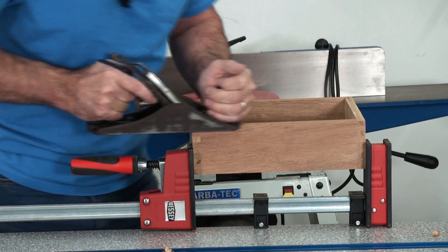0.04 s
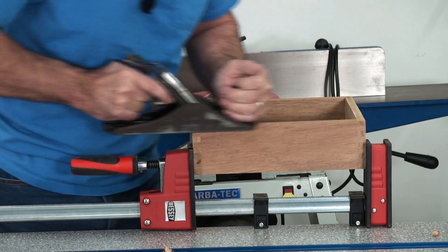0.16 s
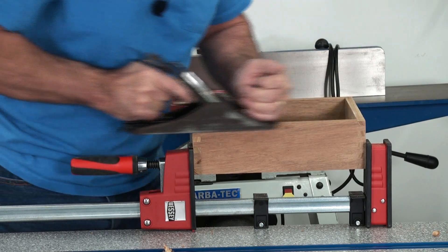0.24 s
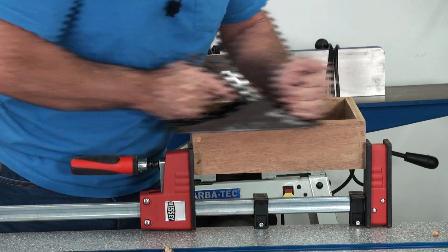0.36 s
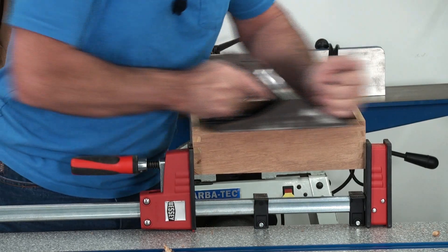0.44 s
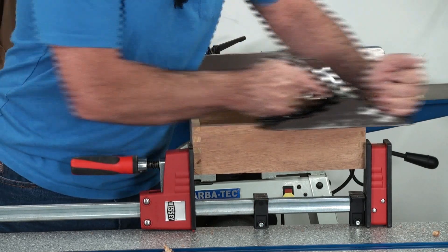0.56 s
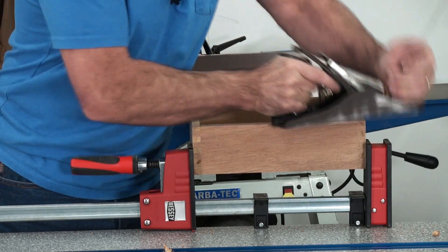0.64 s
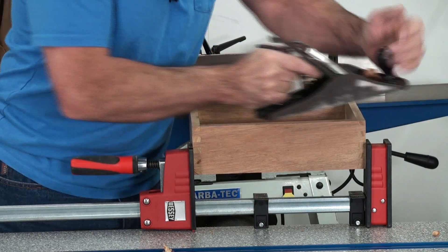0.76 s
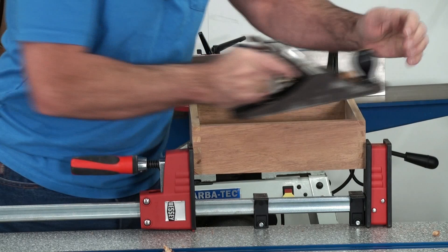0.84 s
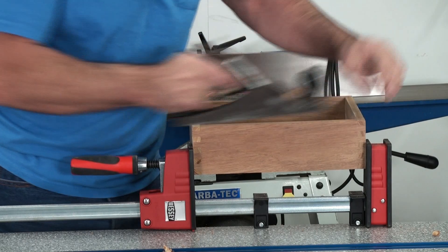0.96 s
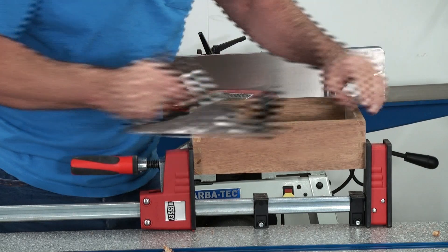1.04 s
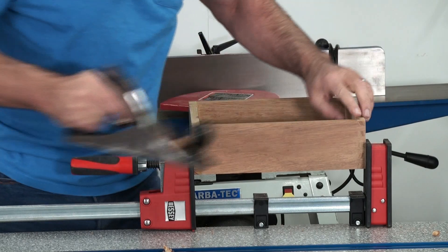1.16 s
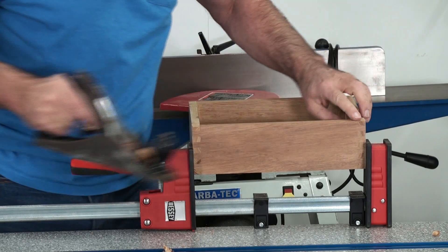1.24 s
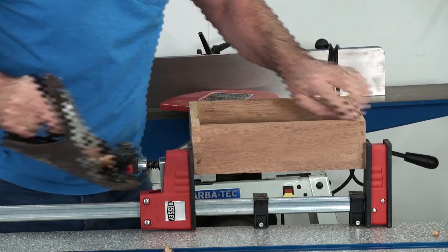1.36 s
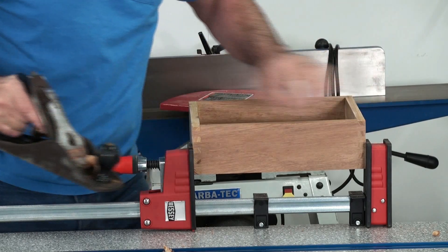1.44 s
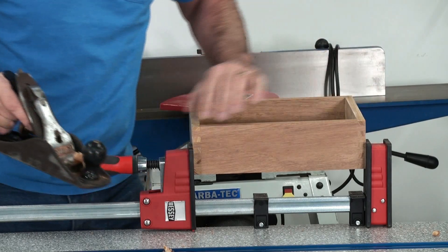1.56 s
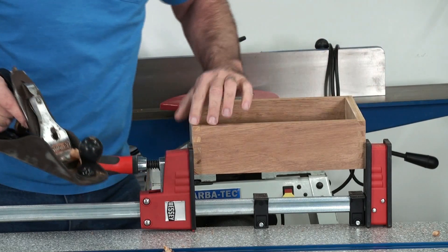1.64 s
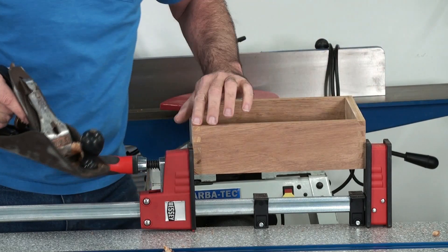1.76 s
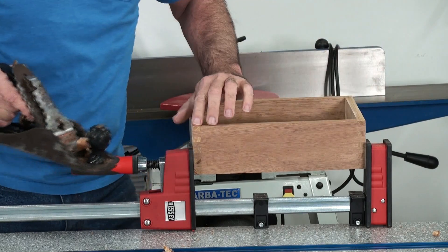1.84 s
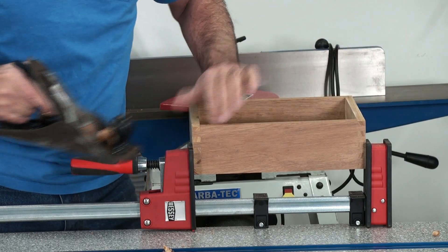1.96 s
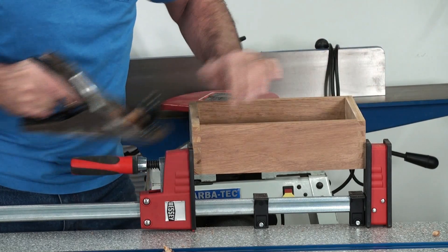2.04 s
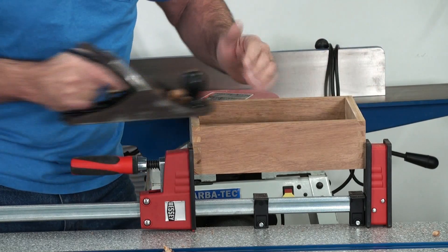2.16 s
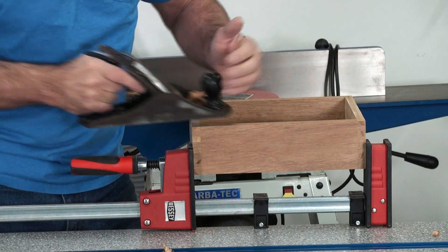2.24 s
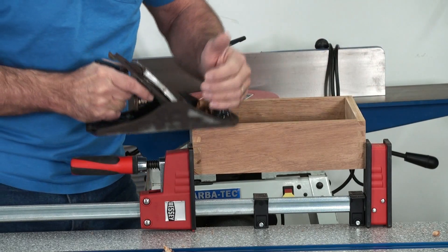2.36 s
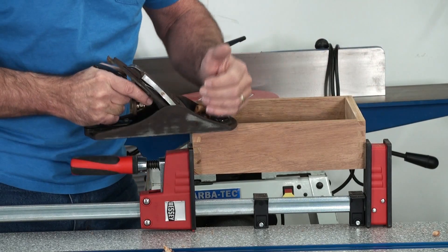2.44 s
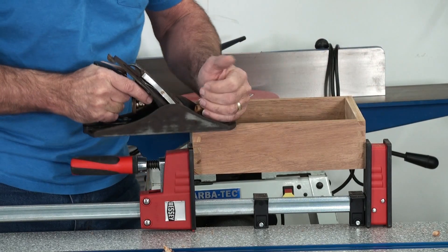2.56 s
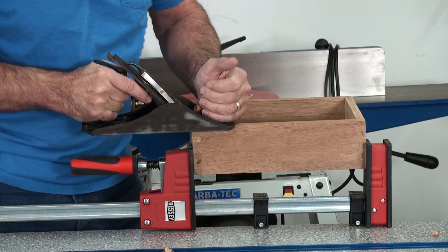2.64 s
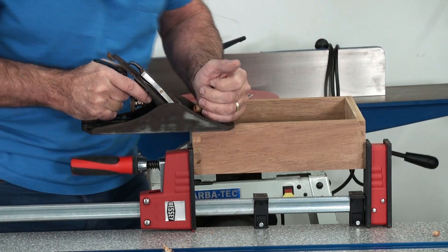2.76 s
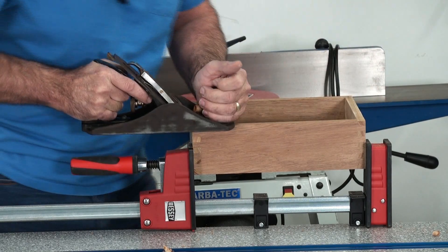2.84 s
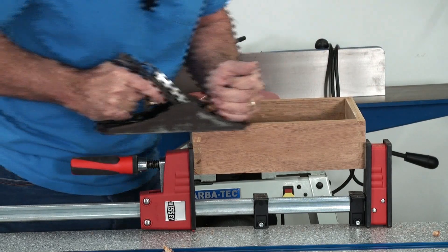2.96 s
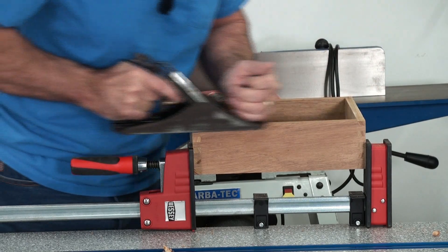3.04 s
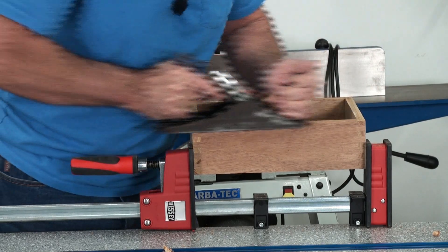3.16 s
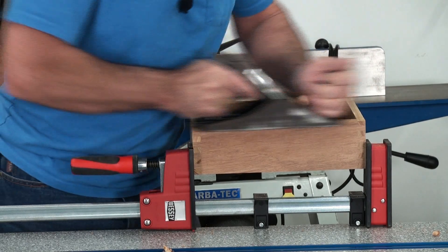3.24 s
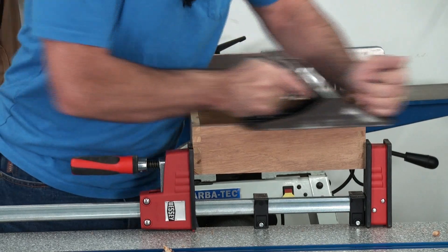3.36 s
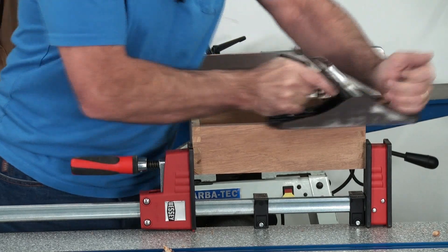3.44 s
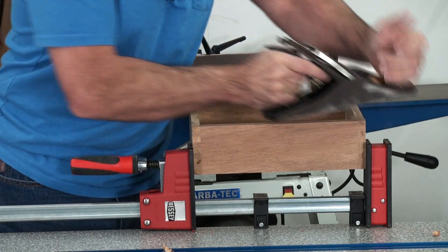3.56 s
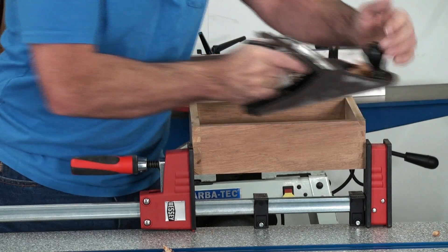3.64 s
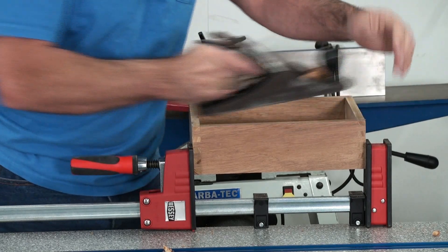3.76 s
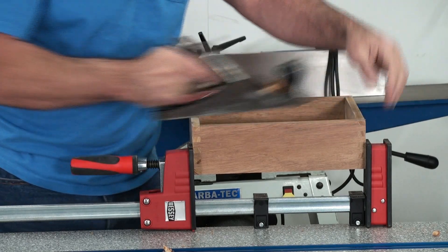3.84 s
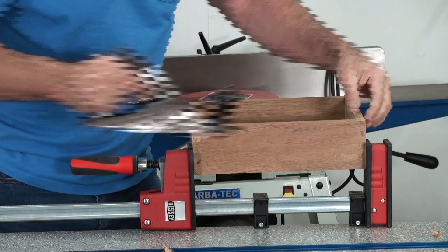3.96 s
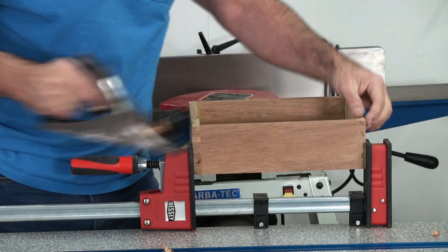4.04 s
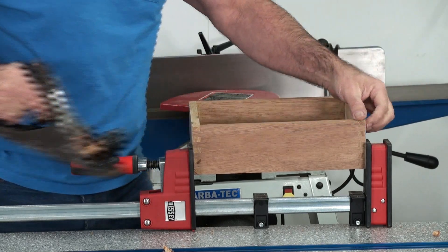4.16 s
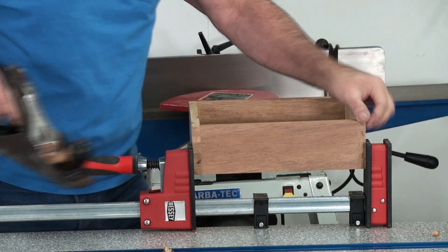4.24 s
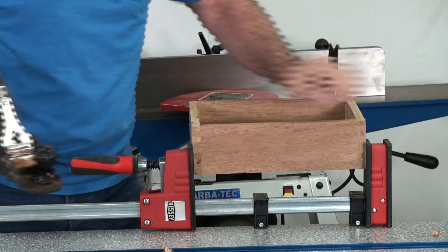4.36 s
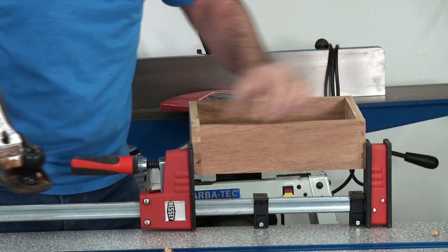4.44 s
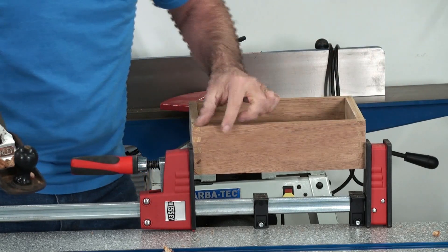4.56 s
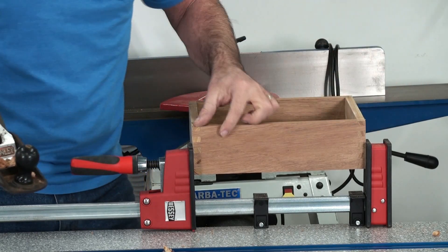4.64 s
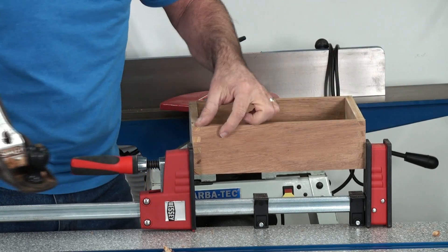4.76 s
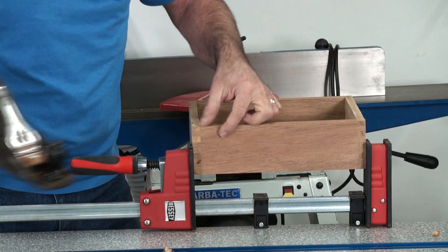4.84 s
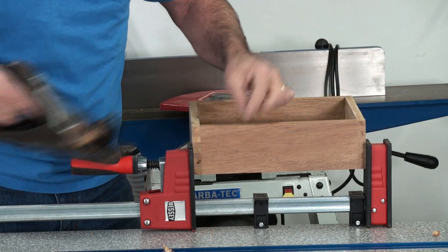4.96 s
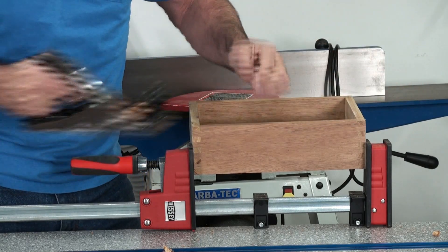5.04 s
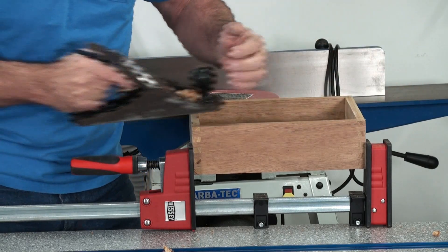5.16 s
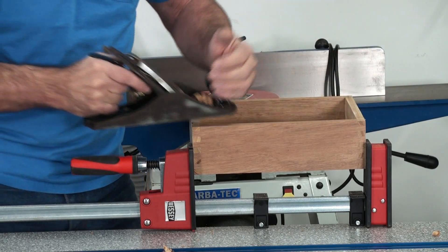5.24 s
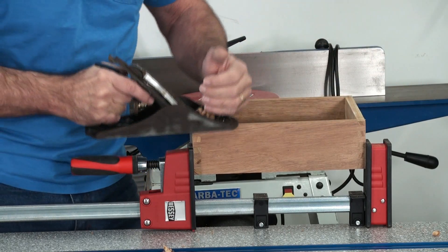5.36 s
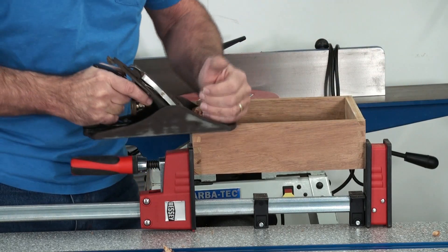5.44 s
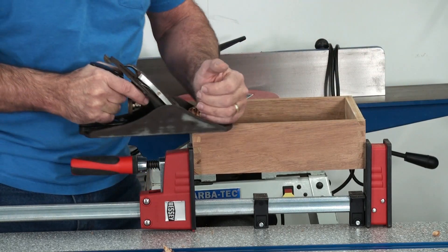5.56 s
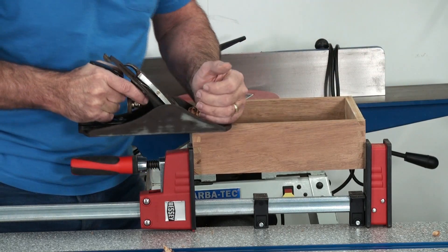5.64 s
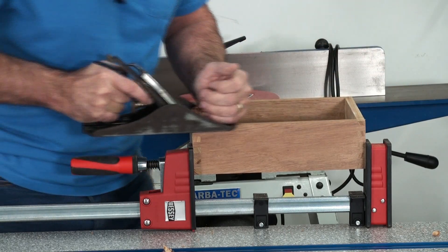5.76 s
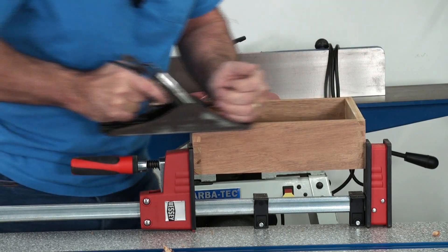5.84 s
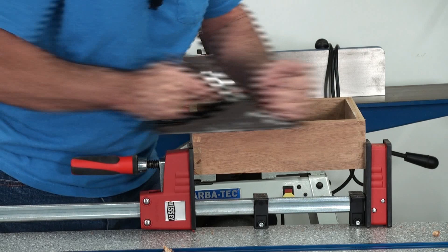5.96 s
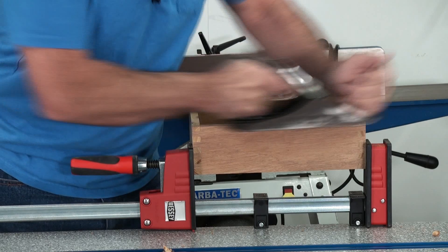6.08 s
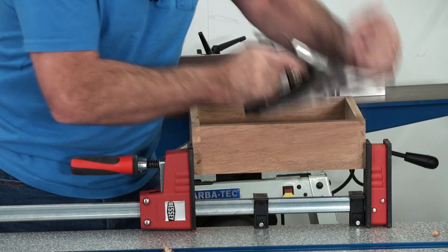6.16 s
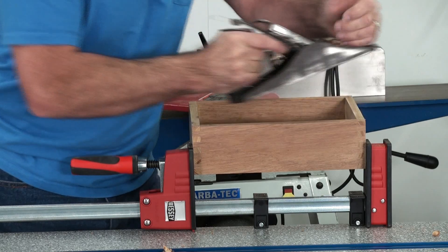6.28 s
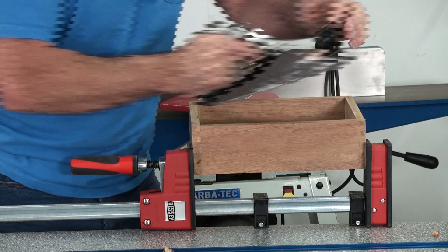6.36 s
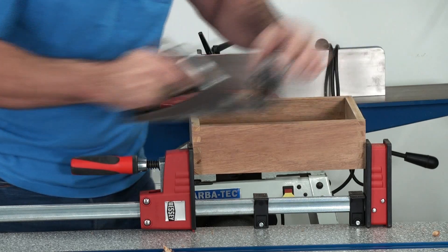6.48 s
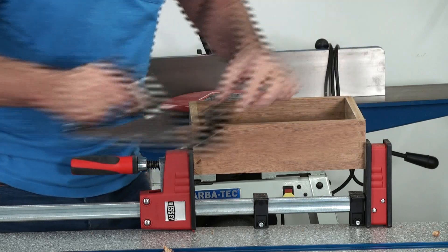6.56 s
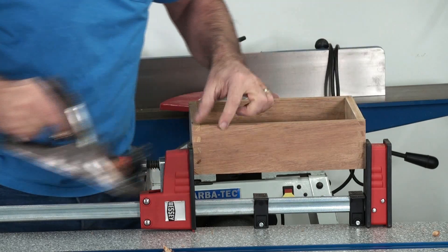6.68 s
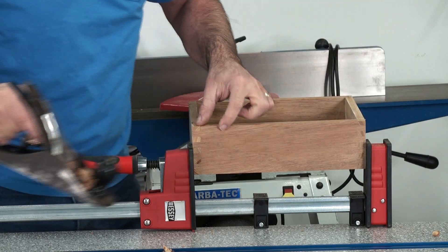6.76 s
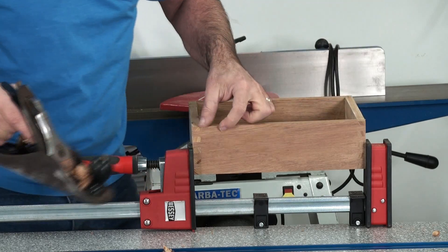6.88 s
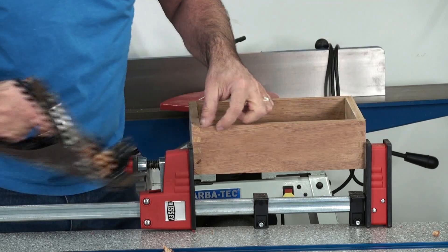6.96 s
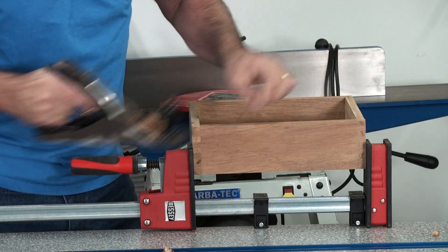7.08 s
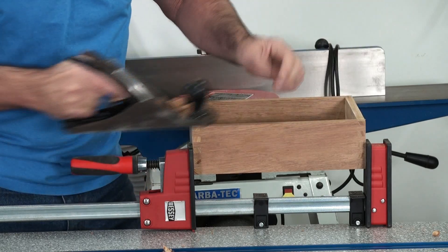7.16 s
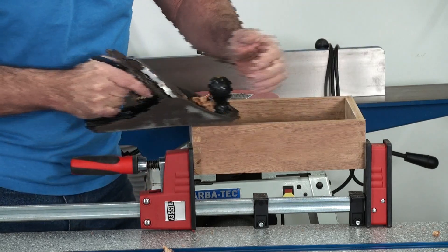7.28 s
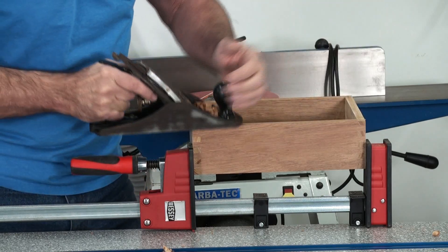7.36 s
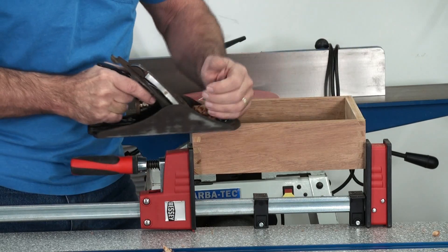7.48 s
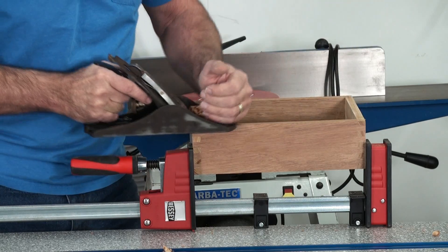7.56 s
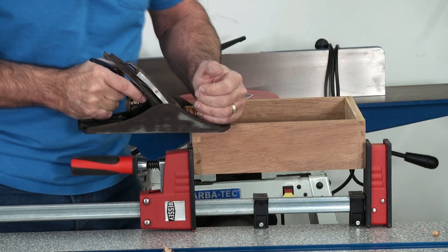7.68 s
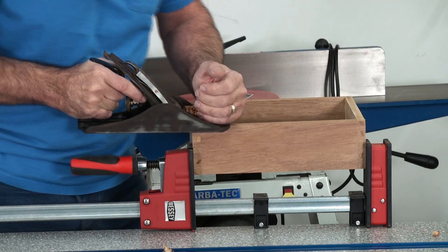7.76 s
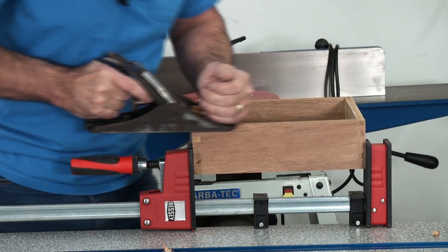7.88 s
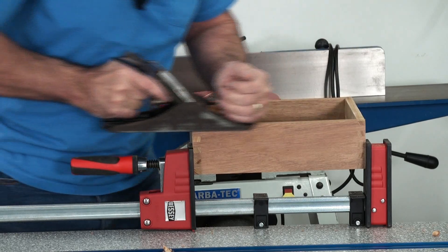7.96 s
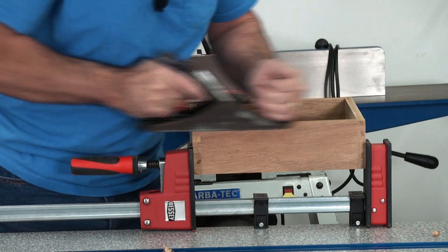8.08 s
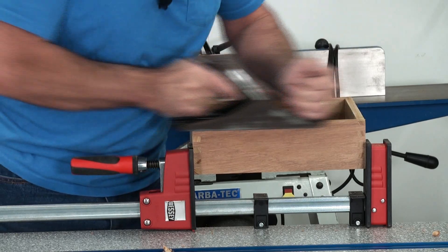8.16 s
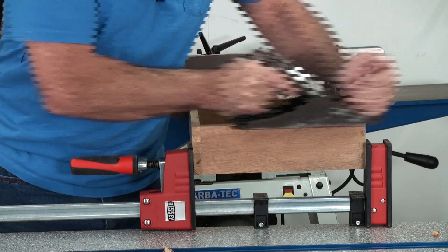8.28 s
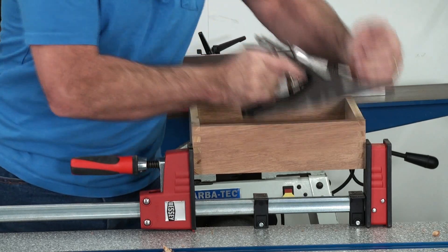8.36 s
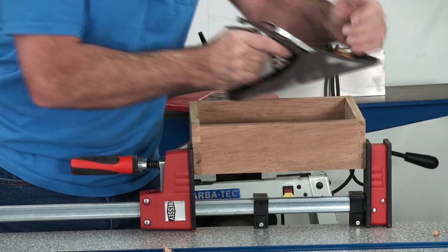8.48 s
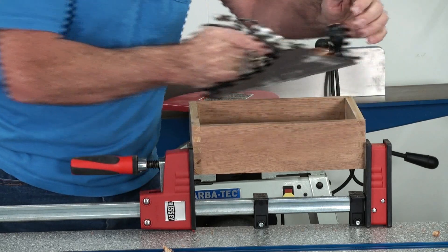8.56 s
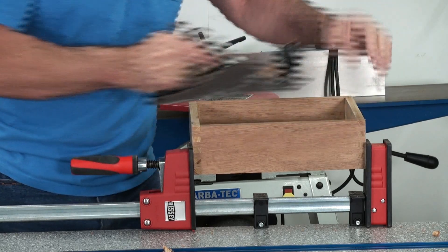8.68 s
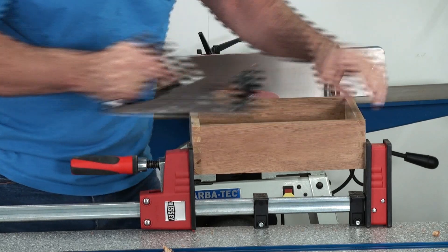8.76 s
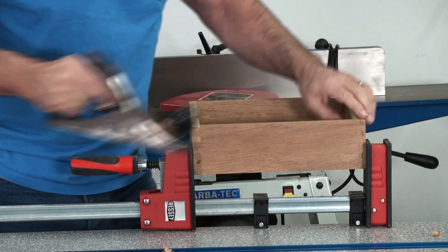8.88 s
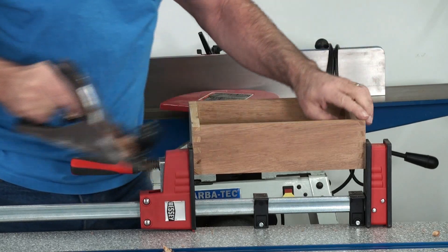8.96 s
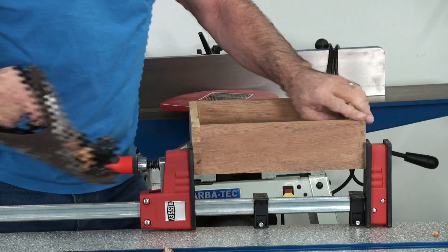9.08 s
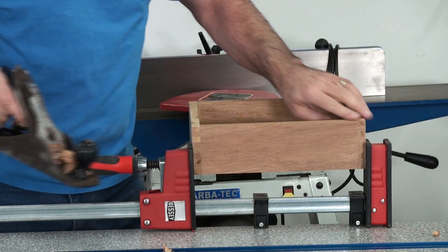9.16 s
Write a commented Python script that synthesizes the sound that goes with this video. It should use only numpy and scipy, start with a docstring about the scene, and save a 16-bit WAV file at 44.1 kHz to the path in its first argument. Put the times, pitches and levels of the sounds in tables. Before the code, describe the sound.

Four brief hissing cuts of a hand plane on wood, separated by pauses, wooden clacks and low thumps of clothing.

```python
"""A hand plane takes four shavings off the edge of a clamped wooden box in a small workshop.
It bites with a knock and hisses: snapping fibres force the resonances of iron, blade and box.
Before each later stroke it is set down, rattles and slides up; then it bites and cuts again.
Throughout, the walls reverberate, and a microphone on the shirt picks up the rumble and
thumps of cloth as the arms swing, over its own hiss."""
import sys
import numpy as np
from scipy import signal
from scipy.fft import rfft, irfft, next_fast_len
from scipy.io import wavfile
from scipy.ndimage import uniform_filter1d

SR = 44100
rng = np.random.default_rng(int(sys.argv[2]) if len(sys.argv) > 2 else 0)


def unload_wav(signal):
    """Save mono or channel-first audio to the path in sys.argv[1] as 16-bit WAV at rate SR, clipped to [-1, 1]."""
    wavfile.write(
        sys.argv[1],
        SR,
        np.round(np.clip(np.atleast_2d(signal).T, -1, 1) * 32767).astype(np.int16),
    )


N = 406602

# The blade takes a shaving. Each row: bite and exit in seconds, level in dB, offset at the bite in dB,
# run-up in seconds, final sag in dB, body, singing, treble and hum weights in dB, settling in seconds.
SHAVINGS = [(0.146, 0.647, -15, -7.5, 0.079, -2.5, 0, 0, -3.5, 0, 0.26),
            (3.019, 3.47, -14, -1.5, .06, -2, 0, 0, -3.5, -2, 0.31),
            (5.882, 6.157, -13.5, -4, 0.015, 0.5, 0.5, -4, -1.5, 0.5, 0.17),
            (7.999, 8.318, -14, -3, 0.035, -4.5, 0, 0, -2.5, -0.5, 0.21)]
# Timbre along every cut. Each row: share of the cut, added body, singing, treble and hum weights in dB.
CUT_TIMBRE = [(0, -4.5, -2.5, -4.5, -3.5), (.12, -4, -0.5, -3, -17), (0.399, -5, -0.5, -1, -20),
              (.6, -9, -1, -1.5, -19), (.8, -7, -3.5, 0.5, -15.5), (1, -6, -9, -5, -13)]
# The toe slides up. Each row: start and end in seconds, peak in dB, rise in seconds, final offset in dB.
TOE_SLIDES = [(2.944, 3.011, -16.5, 0.032, -4.5), (5.832, 5.886, -27, 0.0067, -22.5),
              (7.943, 8.002, -7.5, 0.055, -5.5)]
# A shaving tears off. Each row: start and length in seconds, level, treble and hum weights in dB.
TEAR_OFFS = [(0.62, 0.022, -19.5, -15, -7), (3.464, 0.028, -11.5, -1.5, -10.5),
             (8.321, 0.034, -14.5, -9, -16)]
# Resonances of the iron body, the blade and the mode that sings out. Each row: frequency and
# unbroadened width in Hz, relative level at mid-travel in dB, change over the full travel in dB.
BODY_MODES = [(1106, 33, -6.5, -4), (1269, 31, 1.5, -17.5), (1389, 335, -4, 1), (2051, 190, -6, 0.5),
              (2717, 70, -0.5, -9), (2957, 120, 1, -12), (3240, 130, 0, -11.5), (3451, 55, 0.5, -8.5)]
BLADE_MODES = [(3870, 110, 2, -4.5), (4516, 118, 0, -7.5), (5090, 270, -3, 5.5), (5760, 170, 0, -1.5),
               (6180, 97, -1, 2.5), (6920, 1200, -7.5, 2), (8430, 370, -2, 1), (9070, 200, -0.5, -1),
               (9870, 870, -11, 2), (11300, 530, -13, 1), (13200, 800, -19.5, 0.5),
               (14800, 1500, -29.5, -6.5)]
SINGING_MODES = [(1811, 56, 5.5, 1.5), (1793, 194, -1, 6.5)]
# Box and bench. Each row: frequency in Hz, relative level in dB, T60 in seconds before added damping.
BOX_MODES = [(76.2, -13, 0.56), (163.6, -5, 0.17), (214.2, -5, .35), (292, -12, 0.089), (333, -18.5, .35),
             (380.8, -1, 0.2), (506, -22.5, .2), (477, -25, .15), (611.4, -10, 0.14), (722, -15, 0.19),
             (820, -28, .12), (970, -32.5, .1)]
# Toe or heel lands, or the blade catches end grain. Each row: start in seconds, peak of the box in dB,
# ring of the iron relative to it in dB, time constant of the contact in ms.
IMPACTS = [(0.145, -7.5, 7, 0.47), (0.629, -17.5, -2, 0.17), (2.506, -12.5, -18, 0.19),
           (2.516, -3.5, -35, 0.91), (3.018, -14.5, 15, 1.58), (3.469, -19, 12, 0.23),
           (5.457, -1.5, -12, 0.17), (5.467, -9.5, -37, 1.13), (5.53, -28.5, -4, 0.46),
           (5.612, -24.5, -3, 0.43), (5.89, -13, 15, 0.81), (6.151, -18.5, -8, .15), (7.07, -51, 10, 0.44),
           (7.495, -3, -15.5, 0.16), (7.505, -4, -31.5, 0.79), (7.995, -12, 9, 0.52)]
# The sole settles into place. Each row: start in seconds, clack in dB, rattle in dB.
SOLE_RATTLES = [(2.507, -22.5, -26), (5.457, -14, -19.5), (5.612, -28, -48.5), (7.495, -14, -20),
                (7.674, -37.5, -53.5)]
# Cloth moves on the microphone as the arms swing. Each row: time in seconds, rumble in dB, rustle in dB.
ARM_SWAY = [(0.0, -46, -48.5), (.77, -43, -48), (1.2, -39.5, -44.5), (1.74, -55.5, -51.5),
            (2.15, -46, -46.5), (2.49, -48, -49.5), (2.7, -41, -48), (3.82, -37.5, -47.5),
            (4.21, -47.5, -46.5), (4.93, -53.5, -49), (5.4, -45.5, -46.5), (5.7, -38, -44),
            (6.57, -33.5, -44.5), (7.0, -45.5, -43.5), (7.42, -49, -49), (7.7, -35, -43),
            (8.65, -34, -46.5), (8.96, -45.5, -41), (9.22, -53, -48.5)]
# The shirt tugs the microphone. Each row: start in seconds, level in dB, first and last pitch in Hz,
# length in seconds.
SHIRT_TUGS = [(0.677, -12.5, 50.7, 22, 0.092), (0.751, -18, 55, 30, .07), (.94, -29.5, 33.8, 28, .14),
              (1.201, -27, 35.8, 28, 0.15), (2.267, -33, 45, 35, 0.076), (3.514, -22, 50, 36, 0.085),
              (3.568, -17, 40, 30, 0.11), (3.859, -19.5, 42, 31.9, 0.12), (3.931, -23, 55, 32, 0.072),
              (6.159, -7.5, 66, 25.7, 0.17), (6.284, -19, 60, 30, 0.094), (6.523, -16, 50.3, 28, 0.14),
              (8.365, -7, 60, 70, 0.065), (8.4, -6, 40, 27, 0.12), (8.479, -20.5, 70, 40, 0.064),
              (8.693, -19.5, 69.4, 38, .11)]
# Noise spectra. Each row: frequency in Hz, relative spectral density in dB.
SOLE_SPECTRUM = [(350, 8), (600, -3.5), (842, -7), (1080, -2), (1500, -11.5), (1830, -10.5), (2210, -14.5),
                 (5380, -28.5), (12000, -39.5), (15600, -71), (22000, -120)]
RUMBLE_SPECTRUM = [(8.8, -35), (15, -4), (32, 3.5), (46, 3), (122, -2.5), (198, -16), (300, -34),
                   (390, -46), (660, -120)]
RUSTLE_SPECTRUM = [(65, -31), (110, 2.5), (135, -5), (188, -1.5), (301, -6), (441, -13.5), (668, -19),
                   (714, -19), (1600, -28.5), (2080, -61.5), (3520, -120)]
HISS_SPECTRUM = [(530, -31), (900, -7), (1460, -6), (1600, -4.5), (2140, -5.5), (14800, -7), (15900, -9.5)]
# Reverberation of the workshop. Each row: frequency in Hz, T60 in seconds.
ROOM_DECAY = [(100, 0.24), (300, 0.43), (700, .3), (1200, 0.3), (2000, 0.38), (5500, 0.26), (12000, 0.13)]

SLIDE_TIMBRE_DB = (-6.5, -3.5, -9.5, -14.5)  # body, singing, treble, hum
TEAR_BODY_DB, TEAR_SINGING_DB = -6, -14
SAG_FROM_SHARE, RELEASE_S = 0.75, 0.009
CLACK_T60_S, RATTLE_T60_S, SETTLE_S = 0.075, 0.46, 0.85
JOLT_RISE_S, JOLT_T60_S = 0.047, 0.26
TUG_RISE_SHARE, TUG_FADE_DB = 0.089, -12.5
ROOM_DB, HISS_DB, SIDE_HISS_DB, CUTOFF_HZ = -8.5, -52.5, -72.5, 15960


def planing():
    """Forced vibration: snapping fibres drive iron, blade and box. Returns direct and wall-bound sound."""
    drives = np.zeros((4, N))
    for start, force, *weights_db in contact_forces():
        force = force * signal.windows.tukey(len(force), min(0.004 * SR / len(force), 1))
        snaps = fibre_snaps(len(force), per_s=12000, spread_db=3.0, clump_db=0.86) * force
        for drive, db in zip(drives, weights_db):
            add(drive, start, snaps * gain_of(db))
    body, singing, treble, hum = drives
    # The sole's support shifts as it travels, so one balance of modes fades into another.
    t = np.arange(N) / SR
    travel = sum(np.clip((t - bite) / settling_s, 0, 1) * (t < leave + 1)
                 for bite, leave, *_, settling_s in SHAVINGS)
    wood = excite(box_ring(damping=6.0, db_per_octave=13.6), hum)
    radiated = []
    # Single modes stand out towards the microphone; averaged over all directions they blur.
    for widen, singing_db in (1, 0.5), (3.5, -8.0):
        rasp = wood.copy()
        for drive, modes in (body, BODY_MODES), (treble, BLADE_MODES):
            rasp += excite(iron_ring(modes, 0, widen), drive * (1 - travel))
            rasp += excite(iron_ring(modes, 1, widen), drive * travel)
        tone = gain_of(singing_db) * excite(iron_ring(SINGING_MODES, 0.39, widen), singing)
        radiated.append(curling(rasp, depth_db=2.6) + tone)
    return radiated


def contact_forces():
    """Cutting and friction load the plane. Yields start, force, and body, singing, treble, hum in dB."""
    share, *curves_db = np.transpose(CUT_TIMBRE)
    for bite, leave, db, entry_db, run_up_s, sag_db, *weights_db, _ in SHAVINGS:
        t = np.arange(0, leave - bite, 1 / SR)
        progress = t / t[-1]
        entry = np.maximum(1 - t / run_up_s, 0)
        sag = np.clip((progress - SAG_FROM_SHARE) / (1 - SAG_FROM_SHARE), 0, 1)
        release = np.minimum((t[-1] - t) / RELEASE_S, 1)
        timbre_db = [own + np.interp(progress, share, curve) for own, curve in zip(weights_db, curves_db)]
        yield bite, gain_of(db + entry_db * entry + sag_db * sag) * release, *timbre_db
    for start, end, db, rise_s, end_db in TOE_SLIDES:
        t = np.arange(0, end - start, 1 / SR)
        rise_db = -24 * np.maximum(1 - t / rise_s, 0) ** 1.18
        fall_db = np.interp(t, [rise_s, max(t[-1], rise_s)], [0, end_db])
        yield start, gain_of(db + rise_db + fall_db), *SLIDE_TIMBRE_DB
    for start, length, db, treble_db, hum_db in TEAR_OFFS:
        force = gain_of(db) * signal.windows.tukey(round(length * SR), 0.4)
        yield start, force, TEAR_BODY_DB, TEAR_SINGING_DB, treble_db, hum_db


def fibre_snaps(count, per_s, spread_db, clump_db):
    """Shot noise: wood fibres snap one by one, uneven in size and in clumps of a few ms."""
    clumps = slow_noise(count, 260)
    size = gain_of(spread_db * np.minimum(rng.exponential(1, count), 4) + clump_db * clumps)
    return unit_rms(size * rng.choice([-1., 1.], count) * (rng.random(count) < per_s / SR))


def curling(x, depth_db):
    """Random modulation: the shaving curls and breaks in the mouth, so bands swell and fade."""
    bands = signal.stft(x, nperseg=512, noverlap=384)[2]
    patches = rng.standard_normal(bands.shape[::-1]).T
    patches = unit_rms(uniform_filter1d(uniform_filter1d(patches, 8, axis=0), 18, axis=1))
    excess_db = np.log(10) / 20 * depth_db ** 2  # taken off to preserve the mean power
    return signal.istft(bands * gain_of(depth_db * patches - excess_db), nperseg=512, noverlap=384)[1][:N]


def iron_ring(modes, travel, widen):
    """Modal response of the iron, whose balance shifts with the travel (0 to 1) of the sole."""
    shifted = [(hz, widen * width, db + change_db * (travel - 0.5)) for hz, width, db, change_db in modes]
    return modal_response(shifted, count=4096)


def box_ring(damping, db_per_octave):
    """Damped resonance: pressure widens the box modes, and small sharp forces favour the upper ones."""
    modes = [(hz, damping * 2.2 / t60, db + 20 * np.log10(t60) + db_per_octave * np.log2(hz))
             for hz, db, t60 in BOX_MODES]
    return modal_response(modes, count=SR // 2)


def modal_response(modes, count):
    """Superposition: damped sines of alternating sign sum to an impulse response of unit energy."""
    t = np.arange(count) / SR
    response = sum((-1) ** k * gain_of(db) * width * np.exp(-np.pi * width * t) * np.sin(2 * np.pi * hz * t)
                   for k, (hz, width, db) in enumerate(modes))
    return response / np.linalg.norm(response)


def knocks():
    """Impact excitation: a short push rings the box, and its hard edge rings the pressed-down iron."""
    out = np.zeros(N)
    wood = box_ring(damping=1.4, db_per_octave=0.094)
    iron = iron_ring(BODY_MODES, 0, widen=6.3) + 1.5 * iron_ring(SINGING_MODES, 0, widen=2.7)
    iron += 0.081 * iron_ring(BLADE_MODES, 0, widen=2.5)
    for start, db, iron_db, contact_ms in IMPACTS:
        age = np.arange(400) / SR * 1000 / contact_ms
        blow = signal.oaconvolve(wood, age * np.exp(-age))
        add(out, start, gain_of(db) * blow / abs(blow).max())
        add(out, start, gain_of(db + iron_db) * iron / abs(iron).max())
    return out


def sole_rattle():
    """Exponential decay at two rates: the sole clacks, then rattles into place over faint scraping."""
    out, t = np.zeros(N), np.arange(0, SETTLE_S, 1 / SR)
    fades = np.minimum(t / 0.003, 1) * np.minimum((t[-1] - t) / 0.05, 1)
    for start, clack_db, rattle_db in SOLE_RATTLES:
        clack = gain_of(clack_db - 60 * t / CLACK_T60_S)
        rattle = gain_of(rattle_db - 60 * t / RATTLE_T60_S)
        scraping = gain_of(rattle_db - 31.5)
        grains = coloured(SOLE_SPECTRUM, fibre_snaps(len(t), per_s=3000, spread_db=2.8, clump_db=1.8))
        add(out, start, grains * (clack + rattle + scraping) * fades)
    return out


def cloth_noise():
    """Friction noise: the arms' sway, their push through each cut and the jolts at its ends add in power."""
    t = np.arange(N) / SR
    times, rumble_db, rustle_db = np.transpose(ARM_SWAY)
    bites, leaves, *_ = np.transpose(SHAVINGS)
    cutting = sum(1. * (t > bite) * (t < leave) for bite, leave in zip(bites, leaves))
    push = uniform_filter1d(cutting, 2000).clip(0)

    def envelope(sway_db, push_db, bite_db, leave_db):
        power = gain_of(np.interp(t, times, sway_db)) ** 2 + gain_of(push_db) ** 2 * push
        power += gain_of(bite_db) ** 2 * jolts(bites) + gain_of(leave_db) ** 2 * jolts(leaves)
        return np.sqrt(power)

    rumble = envelope(rumble_db, push_db=-33, bite_db=-28.5, leave_db=-27)
    rustle = envelope(rustle_db, push_db=-49, bite_db=-34.5, leave_db=-30)
    lumps = unit_rms(uniform_filter1d(slow_noise(N, 2000), 2000))
    rumble *= coloured(RUMBLE_SPECTRUM, rng.standard_normal(N))
    rustle *= gain_of(2.0 * lumps) * coloured(RUSTLE_SPECTRUM, rng.standard_normal(N))
    return rumble + rustle


def jolts(starts):
    """Transient power: each jolt of the cloth swells briefly and decays exponentially."""
    power, t = np.zeros(N), np.arange(N) / SR
    for start in starts:
        rise = np.clip((t - start) / JOLT_RISE_S, 0, 1)
        decay = gain_of(-60 * np.clip(t - start - JOLT_RISE_S, 0, 2) / JOLT_T60_S)
        power += (rise * decay) ** 2
    return power


def shirt_thumps():
    """Damped oscillation: each tug of the shirt swings the microphone at a low, gliding pitch."""
    out = np.zeros(N)
    for start, db, first_hz, last_hz, length in SHIRT_TUGS:
        progress = np.arange(0, 1, 1 / (length * SR))
        wobble = 1 + 0.28 * slow_noise(len(progress), 500) * progress
        hz = wobble * (last_hz + (first_hz - last_hz) * (1 - progress) ** 3)
        rise = np.sin(np.pi / 2 * np.minimum(progress / TUG_RISE_SHARE, 1)) ** 2
        fade = gain_of(TUG_FADE_DB * progress) * np.cos(np.pi * progress / 2)
        add(out, start, gain_of(db) * np.sin(2 * np.pi * np.cumsum(hz) / SR) * rise * fade)
    return out


def workshop_reverb(x):
    """Reverberation: sparse reflections die band by band; three sets crossfade steadily for a smooth tail."""
    out, slots = np.zeros(N), np.arange(260, SR - 20, 20)
    angle = np.arange(N) / SR * np.pi * 6.5
    for k in range(3):
        taps = np.zeros(SR)
        taps[slots + rng.integers(0, 20, len(slots))] = rng.choice([-1., 1.], len(slots))
        hz, t, bands = signal.stft(taps, SR, nperseg=256)
        decay = gain_of(-60 * t / value_at(ROOM_DECAY, hz)[:, None])
        tail = signal.istft(bands * decay, SR, nperseg=256)[1]
        share = np.sqrt(2 / 3) * np.cos(angle + k * np.pi / 3)  # the three powers sum to 1
        out += excite(tail / np.linalg.norm(tail), x * share)
    return out


def coloured(spectrum, x):
    """Spectral shaping: x filtered by the given spectrum, at unit rms."""
    size = next_fast_len(len(x) + 512)
    gains = gain_of(value_at(spectrum, np.fft.rfftfreq(size, 1 / SR)))
    return unit_rms(irfft(rfft(x, size) * gains, size)[:len(x)])


def excite(response, drive):
    """Convolution: the output of a linear system over the scene."""
    return signal.oaconvolve(drive, response)[:N]


def slow_noise(count, window):
    """A moving average low-passes white noise; unit rms."""
    return unit_rms(uniform_filter1d(rng.standard_normal(count), window))


def value_at(points, hz):
    """Interpolation on a logarithmic frequency axis."""
    known_hz, values = np.transpose(points)
    return np.interp(np.log(hz + 1), np.log(known_hz + 1), values)


def gain_of(db):
    return 10 ** (np.asarray(db) / 20)


def unit_rms(x):
    return x / np.sqrt(np.mean(x ** 2) + 1e-20)


def add(mix, start_s, sound):
    part = mix[max(round(start_s * SR), 0):][:len(sound)]
    part += sound[:len(part)]


def scene():
    """Superposition at one microphone: plane and box, their reverberation, and the shirt."""
    direct, to_walls = planing()
    blows = knocks() + sole_rattle()
    room = gain_of(ROOM_DB) * workshop_reverb(to_walls + blows)
    mono = direct + blows + room + cloth_noise() + shirt_thumps()
    return np.array([mono, mono])


def record(dry):
    """Steady hiss, soft saturation and a treble limit; nearly mono, with slight width in bass and hiss."""
    hiss, side_hiss = (coloured(HISS_SPECTRUM, white) for white in rng.standard_normal((2, N)))
    bass = signal.sosfilt(signal.butter(1, 250, fs=SR, output="sos"), dry[0])
    side = gain_of(SIDE_HISS_DB) * side_hiss - gain_of(-42.5) * bass
    stereo = dry + gain_of(HISS_DB) * hiss + side * np.array([[1], [-1]])
    saturated = stereo / (1 + (stereo / 0.95) ** 8) ** (1 / 8)
    lowpass = signal.firwin(1023, CUTOFF_HZ, window=("kaiser", 12), fs=SR)
    return signal.oaconvolve(saturated, lowpass[None], "same")


dry = scene()
out = record(dry)
unload_wav(out)
```